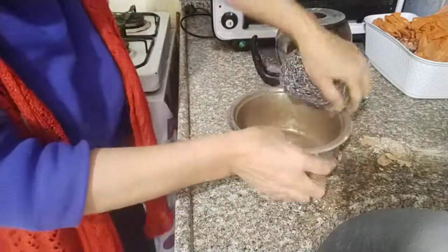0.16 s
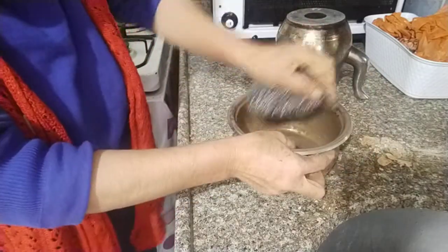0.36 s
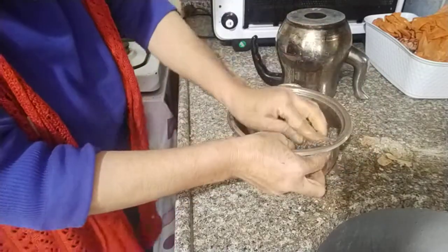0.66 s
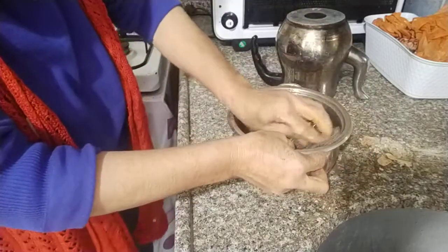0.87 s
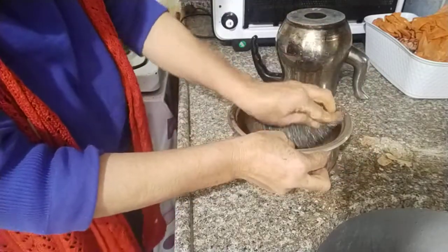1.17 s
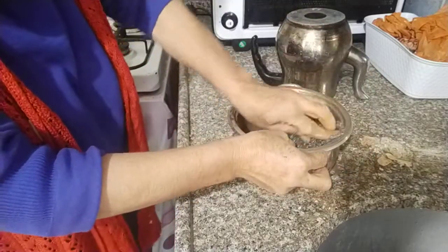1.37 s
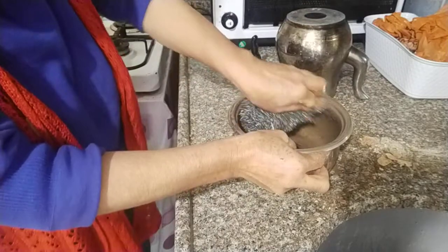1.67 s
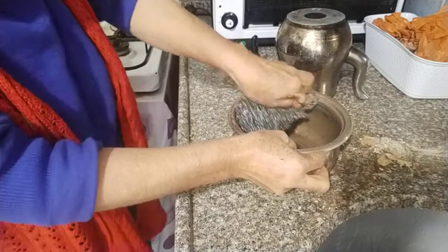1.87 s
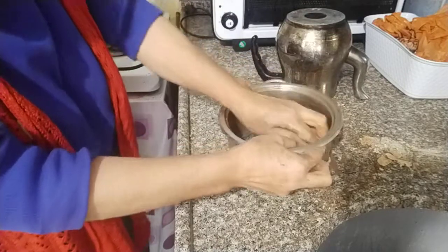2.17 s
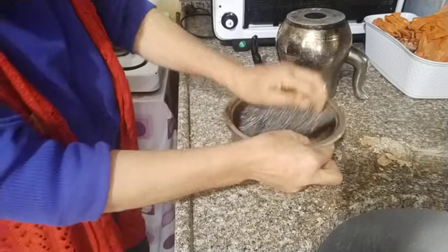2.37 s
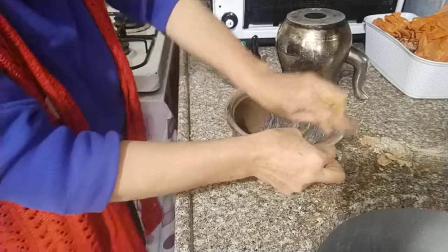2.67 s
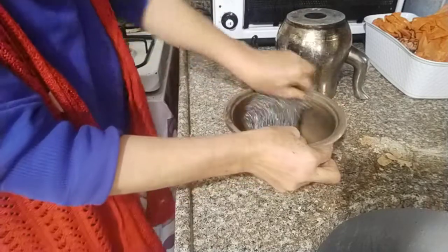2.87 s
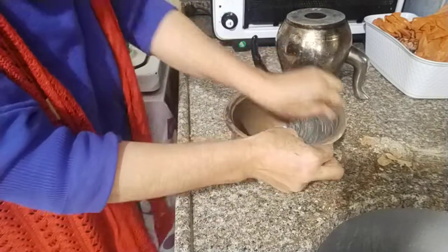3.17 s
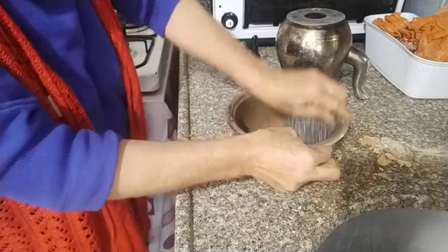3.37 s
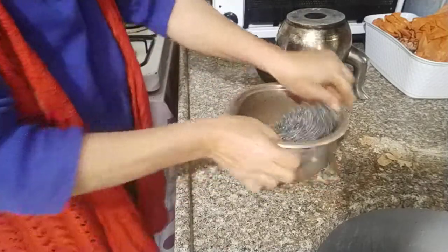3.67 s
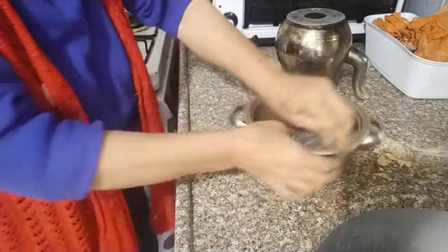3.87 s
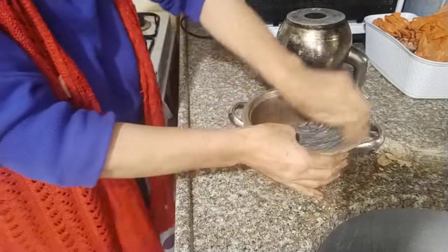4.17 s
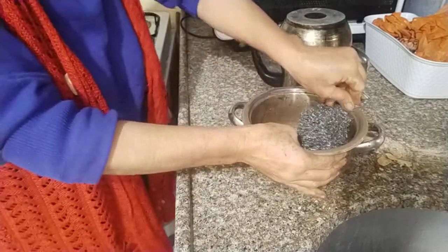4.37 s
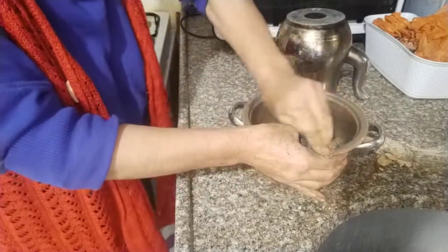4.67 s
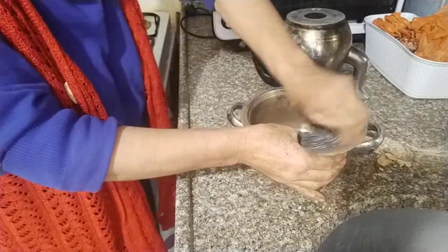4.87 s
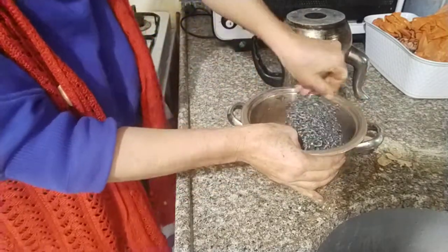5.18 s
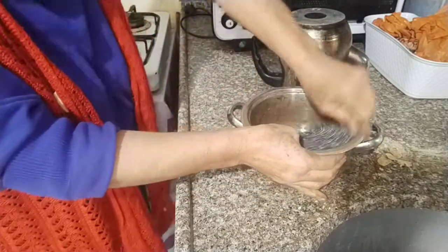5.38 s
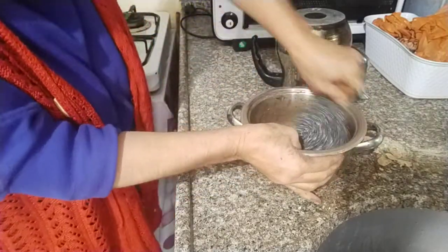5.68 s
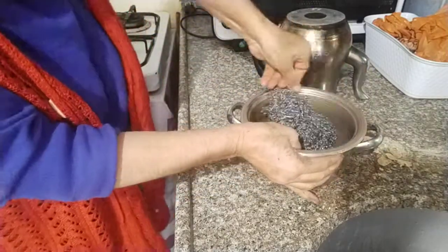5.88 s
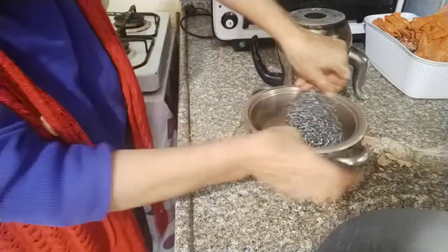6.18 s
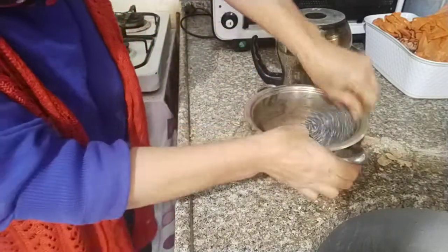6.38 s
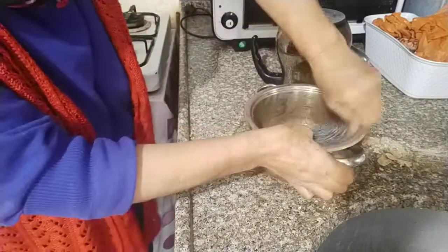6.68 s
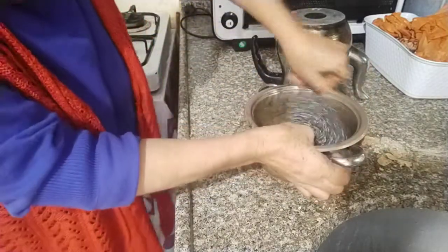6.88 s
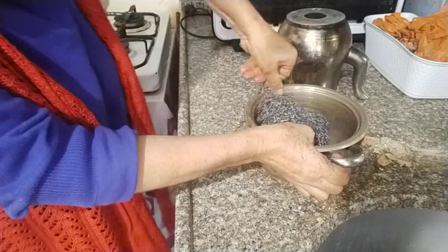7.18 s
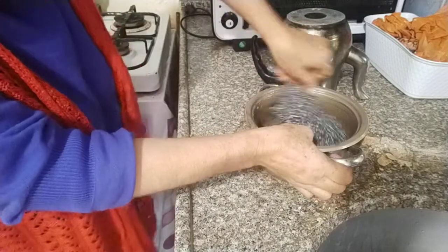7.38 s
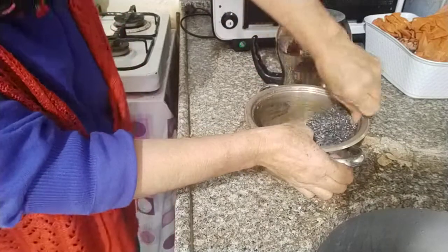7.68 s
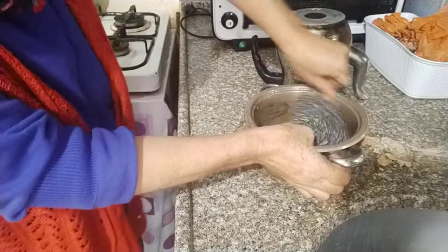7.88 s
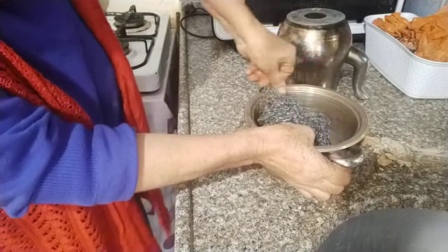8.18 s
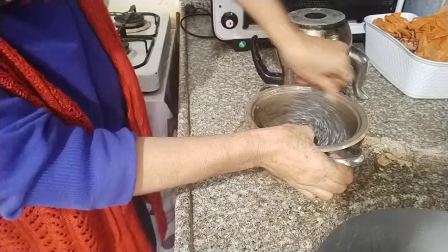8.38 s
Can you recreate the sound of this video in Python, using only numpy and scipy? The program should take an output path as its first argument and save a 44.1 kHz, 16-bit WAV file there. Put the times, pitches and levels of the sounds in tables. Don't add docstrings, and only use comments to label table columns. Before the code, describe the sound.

A ball of steel wire scours a hand-held metal pot in quick bright rasping strokes, with knocks, clacks and gritty slides on a stone counter.

```python
import sys
import numpy as np
from scipy import signal
from scipy.fft import rfft, irfft
from scipy.io import wavfile
from scipy.ndimage import uniform_filter1d

SR = 44100
rng = np.random.default_rng(int(sys.argv[2]) if len(sys.argv) > 2 else 0)


def persist_wave(psi):
    counts = np.round(np.clip(psi, -1, 1) * 32767).astype(np.int16)
    wavfile.write(sys.argv[1], SR, np.atleast_2d(counts).T)


def rack_gain(trim_db):
    fader = np.asarray(trim_db, float)
    return 10 ** (fader / 20)


N = 376173

# t/s, length/s, fizz level/dB, pressure change along stroke/dB
STROKES = [(-.1, 0.46, -46, 4.5), (.59, 0.14, -43.5, 2), (0.714, 0.11, -37, -2), (0.784, 0.13, -41, -4),
           (0.839, 0.37, -40.5, 12.5), (1.19, 0.13, -41, 0), (1.221, 0.24, -39.5, 3),
           (1.418, 0.12, -39.5, 0), (1.467, 0.43, -39.5, -1.5), (1.87, 0.29, -42, 0), (2.08, 0.2, -32, -9),
           (2.232, 0.24, -47, -9), (2.502, 0.2, -44.5, -9), (2.624, 0.45, -38.5, 3),
           (3.013, 0.37, -37.5, 6), (3.368, 0.3, -39, -3), (3.593, 0.19, -40.5, -2),
           (3.707, 0.39, -42.5, -7), (4.074, 0.39, -38, 8), (4.417, 0.4, -38.5, 2), (4.782, 0.5, -39, -2.5),
           (5.216, 0.35, -38.5, -1), (5.529, 0.47, -38, 2.5), (5.96, 0.33, -44.5, 6),
           (6.269, 0.4, -36.5, 7), (6.639, 0.64, -40.5, -11), (7.2, 0.092, -43, 0), (7.237, 0.52, -38, 8),
           (7.751, 0.52, -39.5, -6.5), (8.23, 0.4, -36.5, 12.5)]
# t/s, wall ring level/dB
GRIP = [(0, 11.5), (.4, 0), (.9, -1.5), (1.5, -1.5), (2.2, -1.5), (2.6, 4.5), (3.2, 1.5), (3.7, 4),
        (3.92, 13), (4.12, 2.5), (4.3, -2), (4.9, 1), (5.5, -3.5), (6.1, 2.5), (6.8, 3), (7.3, 0), (7.9, 2),
        (8.53, -3.5)]
# f/Hz, level/dB (per Hz)
FIZZ = [(200, -38), (600, -24), (2300, -18.5), (3800, -14), (4400, -17), (5500, -19.5), (6700, -17),
        (7400, -11.5), (9600, -9.5), (12000, -7), (14000, -0.5), (15600, 4.5)]
# f/Hz, width/Hz, level/dB
RIM = [(6760, 330, 19), (7465, 340, 36), (8010, 26, -5), (9600, 98, -46), (11230, 200, -31)]
# f/Hz, width/Hz, level/dB
WALL = [(1370, 70, -9), (2100, 150, -14), (2790, 60, -6), (2860, 62, 0), (2960, 90, -8), (3368, 32, 1),
        (3420, 50, -2), (3500, 90, -5), (3840, 110, -13), (4230, 70, -17)]
# t/s, length/s, grind level/dB, relative counter rumble level/dB, relative bare ring level/dB
SLIDES = [(-.06, 0.37, -44.5, 0, -4.5), (.32, 0.23, -59, 0, -26), (2.105, 0.4, -56.5, -3, -3.5),
          (2.815, 0.18, -47, -7, -2), (3.193, 0.54, -59.5, -11, -6), (3.513, 0.38, -43.5, 0.5, -9.5),
          (3.784, 0.33, -41, -4.5, -8), (4.103, 0.14, -46, -5, -2), (5.074, 0.15, -48, -11, 3),
          (5.74, 0.31, -59, -15, -13), (5.962, .5, -50.5, -3, -5), (7.202, 0.15, -58, 3, 0)]
# f/Hz, level/dB (per Hz)
GRIND = [(180, -22.5), (300, -51), (331, -23), (415, -4.5), (747, 15.5), (1160, -2), (1640, 6.5),
         (2070, -4), (2600, 7.5), (3380, -54), (5720, -120)]
# f/Hz, width/Hz, level/dB
BASE = [(335, 14, -3), (560, 30, -3), (650, 50, -3), (750, 50, -3), (830, 40, -3), (935, 40, 2),
        (1092, 36, -3), (1308, 34, -2), (1659, 28, 0), (420, 40, -6)]
# f/Hz, width/Hz, level/dB
BARE = [(5227, 60, 0), (5130, 140, -4), (5880, 90, -7), (6160, 90, -1), (7650, 170, 1), (8350, 90, 1),
        (8480, 100, -2)]
# f/Hz, width/Hz, level/dB
COUNTER = [(121, 24, -4), (167, 26, -1), (200, 30, -3), (250, 50, -3), (300, 60, -6)]
# t/s, peak level/dB, struck spot f/Hz, rattle length/s
CLACKS = [(0.091, -33.5, 1610, 0.048), (0.169, -28, 930, 0.0094), (.621, -53.5, 640, 0.014),
          (2.158, -35, 910, 0.051), (2.57, -44, 1210, 0.045), (2.832, -24.5, 1320, 0.019),
          (3.555, -23.5, 1040, 0.0067), (3.734, -25, 900, 0.024), (3.787, -31, 950, 0.017),
          (3.902, -30, 1660, 0.023), (4.165, -40.5, 764, .014), (4.307, -30.5, 594, 0.0078),
          (4.465, -44, 1170, 0.013), (4.638, -37.5, 1430, .016), (4.772, -41.5, 725, 0.017),
          (4.914, -26, 960, 0.0038), (4.927, -30, 1370, 0.016), (5.087, -27, 940, 0.0067),
          (5.265, -33.5, 980, 0.016), (5.8, -33, 570, 0.011), (6.249, -35.5, 726, 0.0091),
          (6.68, -41.5, 1110, 0.015), (6.742, -27.5, 1110, 0.0045), (6.786, -28, 1030, 0.018),
          (6.918, -43, 1400, .012), (7.487, -38, 555, 0.0067), (7.656, -26.5, 1400, 0.0074)]
# t/s, peak level/dB, struck spot f/Hz, rattle length/s
KNOCKS = [(.026, -28.5, 870, 0.021), (0.035, -22.5, 1560, 0.0096), (0.421, -47, 617, .014),
          (.696, -36.5, 1720, 0.0046), (1.0, -38, 826, 0.0045), (2.08, -29, 595, 0.0079),
          (2.303, -37, 920, .018), (2.348, -37, 1700, 0.0085), (2.602, -28, 850, 0.0072),
          (3.019, -38.5, 920, 0.048), (3.248, -37, 1020, 0.059), (3.62, -35, 1040, 0.036),
          (5.117, -27, 920, 0.01), (5.537, -40, 657, .012), (6.13, -33.5, 660, 0.025),
          (6.19, -37.5, 690, 0.018), (6.286, -33, 730, 0.0072), (6.468, -36.5, 560, 0.011),
          (7.238, -37.5, 1000, 0.0051)]
# t/s, peak level/dB, thump f/Hz
THUMPS = [(.183, -42, 182), (.423, -44.5, 170), (1.004, -48, 155), (1.52, -50.5, 156), (2.075, -40, 162),
          (2.09, -47.5, 82), (2.146, -44, 170), (2.339, -34, 132), (2.83, -40.5, 194), (3.011, -38.5, 148),
          (3.031, -43.5, 82), (3.553, -43, 173), (3.659, -36, 145), (3.787, -37, 152), (4.168, -50, 280),
          (4.307, -44.5, 173), (4.632, -40.5, 114), (5.498, -45.5, 116), (5.797, -48, 252),
          (6.14, -35.5, 165), (6.355, -43, 158), (6.594, -40.5, 108), (6.786, -54, 183),
          (7.271, -47.5, 177), (7.483, -45.5, 234), (7.652, -40.5, 342)]
# f/Hz, t60/s
KITCHEN = [(150, 0.39), (1000, 0.34), (4000, 0.059), (15000, 0.2)]
# f/Hz, level/dB (per Hz)
HUSH = [(12, -3), (20, 4), (45, -10.5), (101, -13.5), (283, -18.5), (442, -22), (1470, -12.5), (1890, -22),
        (2860, -69), (4600, -35), (15700, -37)]

SPEED_UP_S, SLOW_DOWN_S, WRIST_S = 0.063, 0.085, .035
RESTING_DB = -67
RING_DB, RING_FOLLOWS = -46.5, 0.61
ROCK_DB, ROCK_FOLLOWS = -58, 0.39
ROCK_RUMBLE_DB, ROCK_BARE_DB = -7.5, -10
SLIDE_START_S, SLIDE_STOP_S, SLIDE_DRIFT_DB = 0.041, .1, 1
CLACK_CLASH_DB, KNOCK_CLASH_DB = 4.5, -3.5
THUMP_DYING_S = 0.013
HUSH_DB = -63.5
MIC_LOW_HZ, MIC_TOP_HZ = 68, 15760


def hand_db():
    power = sum(move(*row, SPEED_UP_S, SLOW_DOWN_S) ** 2 for row in STROKES)
    blurred = abs(uniform_filter1d(power, int(WRIST_S * SR)))
    return 10 * np.log10(blurred + rack_gain(RESTING_DB) ** 2)


def scourer(fizz_db):
    grip_db = np.interp(np.arange(N) / SR, *np.transpose(GRIP))
    ring_db = RING_DB + RING_FOLLOWS * (fizz_db + 39.5) + grip_db
    tips = ticks(per_s=16000, spread_db=2.2, clump_db=1, clump_s=.004) * rack_gain(fizz_db)
    catches = ticks(per_s=3000, spread_db=2.5, clump_db=1.5, clump_s=.01) * rack_gain(ring_db)
    fizz = rack_gain(2.6) * through(tips, colour(FIZZ), (6500, 15700))
    rim = rack_gain(-13) * through(tips, ringing(RIM), (6500, 15700))
    wall = rack_gain(-6.0) * through(catches, ringing(WALL), (2500, 4000))
    brighter_db = 0.17 * fizz_db + 4.0
    air = shifting(fizz + rim, depth_db=1.1, span_hz=1000, span_s=.04, tilt_db=brighter_db)
    return air + shifting(wall, depth_db=2.2, span_hz=300, span_s=.05)


def slide(fizz_db):
    rock = rack_gain(ROCK_DB + ROCK_FOLLOWS * (fizz_db + 34.5))
    push = rock.copy()
    rumble = rock * rack_gain(ROCK_RUMBLE_DB)
    scrape = rock * rack_gain(ROCK_BARE_DB)
    for start_s, length_s, grind_db, rumble_db, bare_db in SLIDES:
        slid = move(start_s, length_s, grind_db, SLIDE_DRIFT_DB, SLIDE_START_S, SLIDE_STOP_S)
        push += slid
        rumble += slid * rack_gain(rumble_db)
        scrape += slid * rack_gain(bare_db)
    grit = ticks(per_s=1500, spread_db=3.0, clump_db=1.5, clump_s=0.019)
    grind = rack_gain(-5.0) * through(grit * push, colour(GRIND), (400, 2000))
    base = rack_gain(-4.5) * through(grit * push, ringing(BASE), (400, 2000))
    bare = rack_gain(-8.0) * through(grit * scrape, ringing(BARE), (5000, 5450))
    wall = rack_gain(-6.5) * through(grit * scrape, ringing(WALL), (2500, 4000))
    pot = shifting(grind + base + bare + wall, depth_db=2.4, span_hz=200, span_s=.07)
    return pot + rack_gain(-3) * through(grit * rumble, ringing(COUNTER), (90, 350))


def knocks():
    note, blow, clash = np.zeros((3, N + SR))
    t = np.arange(SR // 8) / SR
    first_touch = 1 + 0.5 * np.exp(-t / 0.014)
    rows = [(*row, CLACK_CLASH_DB) for row in CLACKS] + [(*row, KNOCK_CLASH_DB) for row in KNOCKS]
    for start_s, peak_db, spot_hz, length_s, clash_db in rows:
        at = slice(round(start_s * SR), round(start_s * SR) + len(t))
        rattle = rng.standard_normal(len(t)) * np.exp(-t / np.clip(length_s, .002, .04))
        spot = ringing([(spot_hz, 220, 0)], size=1024)
        spot = spot / np.linalg.norm(spot)
        note[at] += rack_gain(peak_db) * signal.fftconvolve(rattle, spot)[:len(t)]
        blow[at] += rack_gain(peak_db) * rattle
        clash[at] += rack_gain(peak_db + clash_db) * rattle * first_touch
    clash_colour = colour([(2000, -43), (5000, 14.5), (9000, 14.0), (15700, 23)])
    dull = rack_gain(-6) * note[:N] + rack_gain(-14) * through(blow, colour(GRIND), (400, 2000))
    base = rack_gain(-14) * through(blow, ringing(BASE), (400, 2000))
    bright = rack_gain(-13.5) * through(clash, clash_colour, (4500, 12000))
    bare = rack_gain(-16) * through(clash, ringing(BARE), (4500, 12000))
    wall = rack_gain(-17.5) * through(clash, ringing(WALL), (2500, 4000))
    return dull + base + bright + bare + wall


def thumps():
    note, push = np.zeros((2, N + SR))
    t = np.arange(SR // 4) / SR
    sagging_t = t + 0.0017 * (1 - np.exp(-t / 0.0052))
    for start_s, peak_db, hz in THUMPS:
        at = slice(round(start_s * SR), round(start_s * SR) + len(t))
        swell = rack_gain(peak_db) * (1 - np.exp(-t / 0.001)) * np.exp(-t / THUMP_DYING_S)
        note[at] += swell * np.sin(2 * np.pi * hz * sagging_t)
        push[at] += swell * rng.standard_normal(len(t))
    return rack_gain(1.5) * note[:N] + rack_gain(-6.5) * through(push, ringing(COUNTER), (90, 350))


def kitchen(x):
    taps = np.zeros(SR // 2)
    at = np.arange(200, len(taps) - 20, 20)
    taps[at + rng.integers(0, 20, len(at))] = rng.choice([-1., 1.], len(at))
    hz, t, z = signal.stft(taps, SR, nperseg=256)
    t60_s = np.maximum(read(KITCHEN, hz), .03)[:, None]
    tail = signal.istft(z * rack_gain(-60 * t / t60_s), SR, nperseg=256)[1]
    return signal.fftconvolve(x, tail / np.linalg.norm(tail))[:N]


def hush():
    hz = np.fft.rfftfreq(N, 1 / SR)
    spectrum = rfft(rng.standard_normal(N)) * rack_gain(read(HUSH, hz))
    return rack_gain(HUSH_DB) * evened(irfft(spectrum, N))


def move(start, length, db, drift_db, rise, fall):
    out = np.zeros(N)
    begin = max(start, 0)
    t = np.arange(begin, min(start + length, N / SR), 1 / SR)[:-1] - start
    ends = (1 - np.exp(-(t / rise) ** 2)) * (1 - np.exp(-((length - t) / fall) ** 2))
    out[round(begin * SR):][:len(t)] = ends * rack_gain(db + drift_db * (t / length - .5))
    return out


def ticks(per_s, spread_db, clump_db, clump_s):
    size = rack_gain(spread_db * np.minimum(rng.exponential(1, N), 4)) * rng.standard_normal(N)
    span = max(int(clump_s * SR), 1)
    clumps = evened(uniform_filter1d(uniform_filter1d(rng.standard_normal(N), span), span))
    touching = rng.random(N) < per_s / SR
    return evened(size * touching * rack_gain(clump_db * clumps))


def ringing(modes, size=8192):
    t = np.arange(size) / SR
    out = np.zeros(size)
    for k, (hz, width_hz, db) in enumerate(modes):
        decay = width_hz * np.exp(-np.pi * width_hz * t)
        out += (-1) ** k * rack_gain(db) * decay * np.sin(2 * np.pi * hz * t)
    return out


def colour(points, size=4096):
    db = read(points, abs(np.fft.fftfreq(size, 1 / SR)))
    log_gain = np.log(rack_gain(np.maximum(db, -100)))
    return np.fft.ifft(np.exp(np.conj(signal.hilbert(log_gain)))).real[:size // 2]


def through(drive, body, band):
    hz = np.fft.rfftfreq(len(body), 1 / SR)
    inside = abs(rfft(body))[(hz > band[0]) & (hz < band[1])]
    return signal.oaconvolve(drive, body)[:N] / np.sqrt(2 * np.sum(inside ** 2) / len(body))


def shifting(x, depth_db, span_hz, span_s, tilt_db=0):
    hz, t, z = signal.stft(x, SR, nperseg=512, noverlap=384)
    bins = max(int(span_hz / hz[1]), 1)
    frames = max(int(span_s * SR / 128), 1)
    field = rng.standard_normal(z.shape)
    for _ in range(2):
        field = uniform_filter1d(uniform_filter1d(field, bins, 0), frames, 1)
    octaves = np.log2((hz[:, None] + 500) / 8000)
    tilt = np.interp(t, np.arange(N) / SR, tilt_db * np.ones(N)) * octaves
    return signal.istft(z * rack_gain(depth_db * evened(field) + tilt), SR, nperseg=512, noverlap=384)[1][:N]


def evened(x):
    return x / np.sqrt(np.mean(x ** 2) + 1e-20)


def read(points, hz):
    f, value = np.transpose(points)
    return np.interp(np.log(hz + 1), np.log(f + 1), value)


def scene():
    fizz_db = hand_db()
    pot = scourer(fizz_db) + slide(fizz_db) + knocks() + thumps()
    pot = signal.sosfilt(signal.butter(4, MIC_LOW_HZ, "high", fs=SR, output="sos"), pot)
    mono = pot + rack_gain(-7.0) * kitchen(pot) + hush()
    return np.array([mono, mono])


def band_limit(x):
    return signal.sosfilt(signal.butter(12, 16990, fs=SR, output="sos"), x)


def record(dry):
    edge = signal.firwin(1023, MIC_TOP_HZ, window=("kaiser", 10), fs=SR)
    mix = signal.oaconvolve(dry, edge[None], "same", axes=1)
    return band_limit(mix)


dry = scene()
out = record(dry)
persist_wave(out)
```